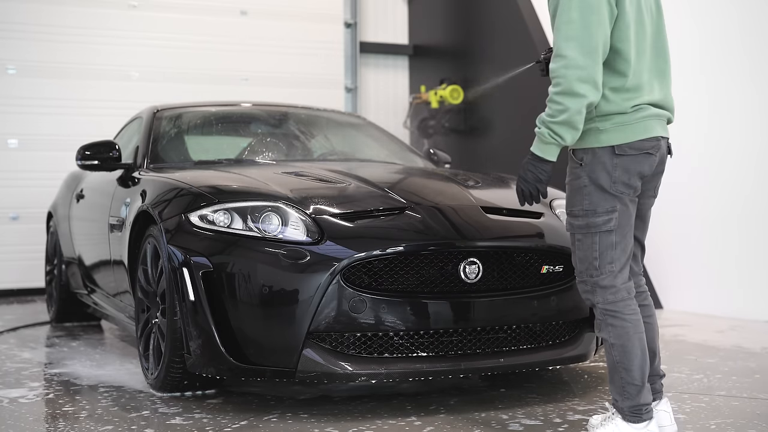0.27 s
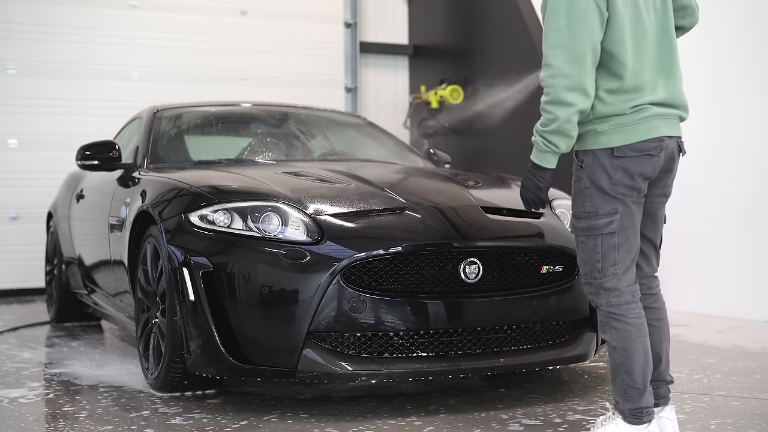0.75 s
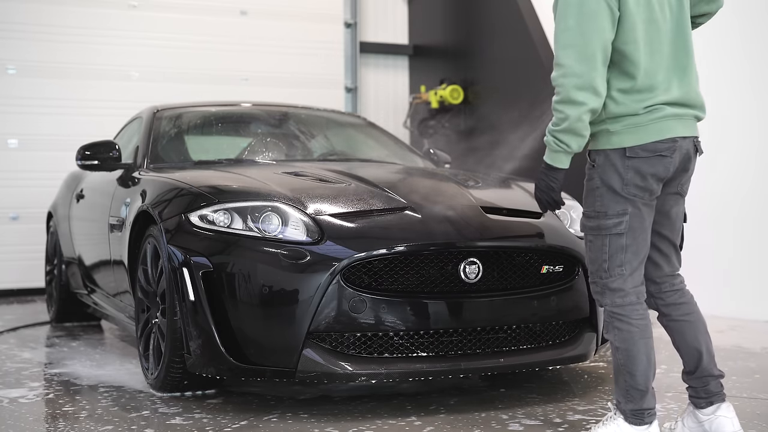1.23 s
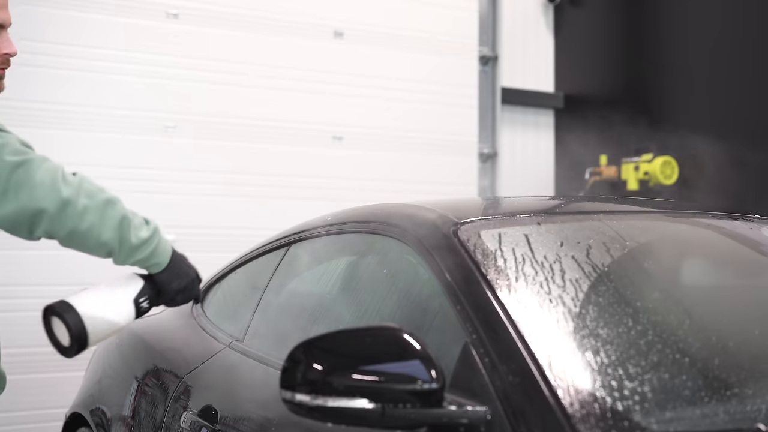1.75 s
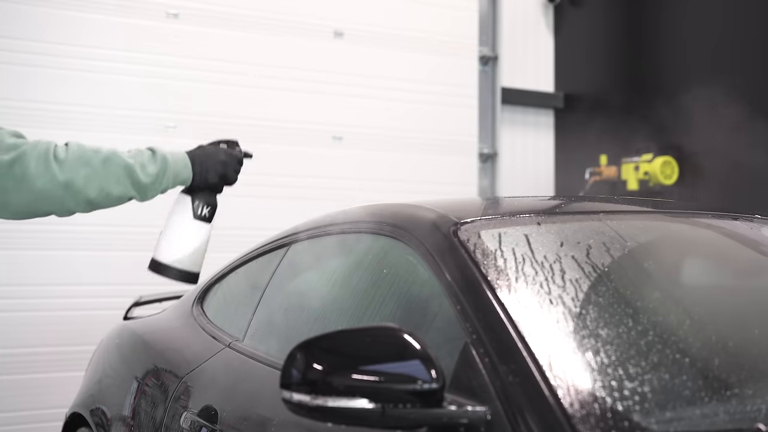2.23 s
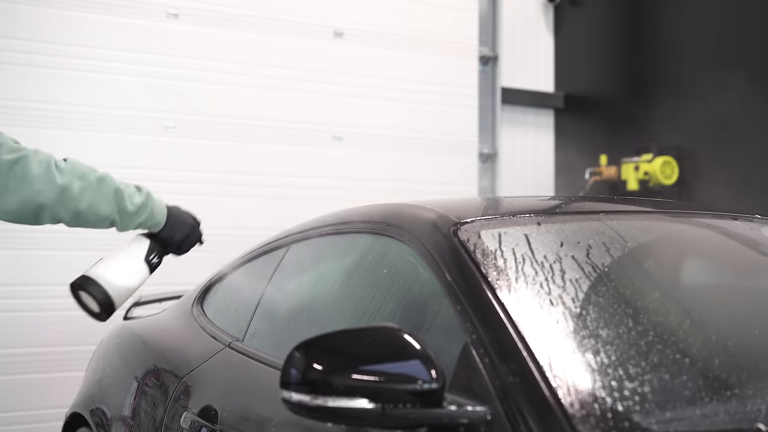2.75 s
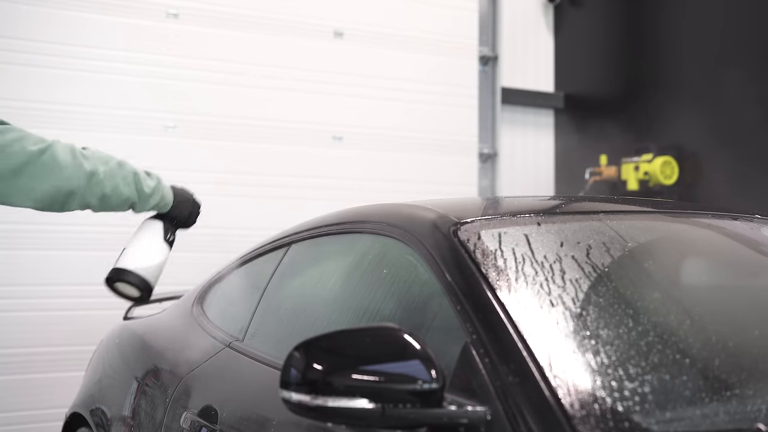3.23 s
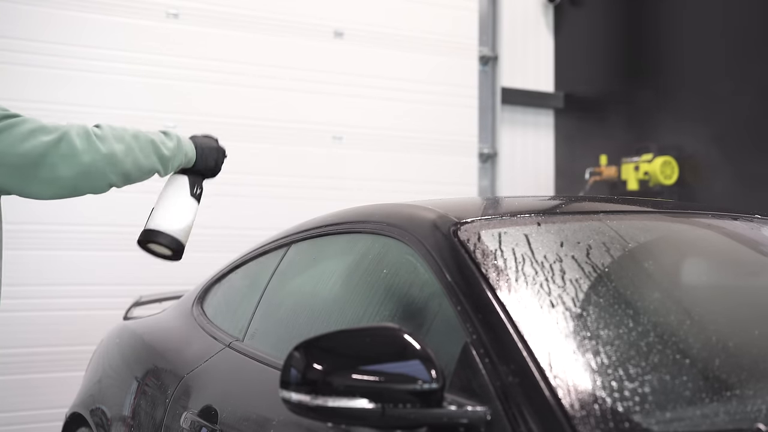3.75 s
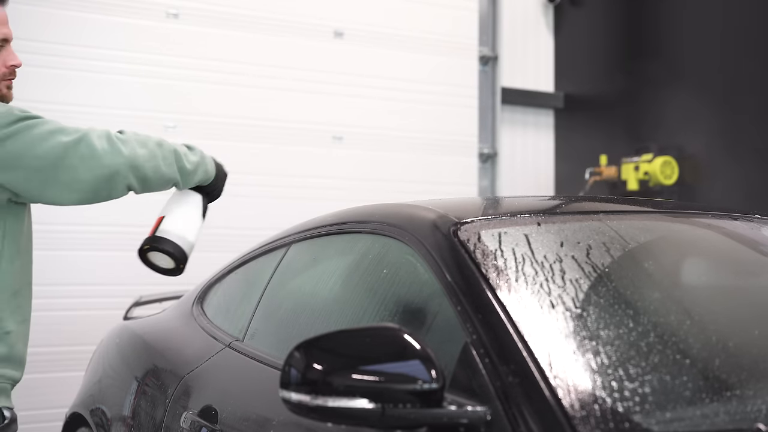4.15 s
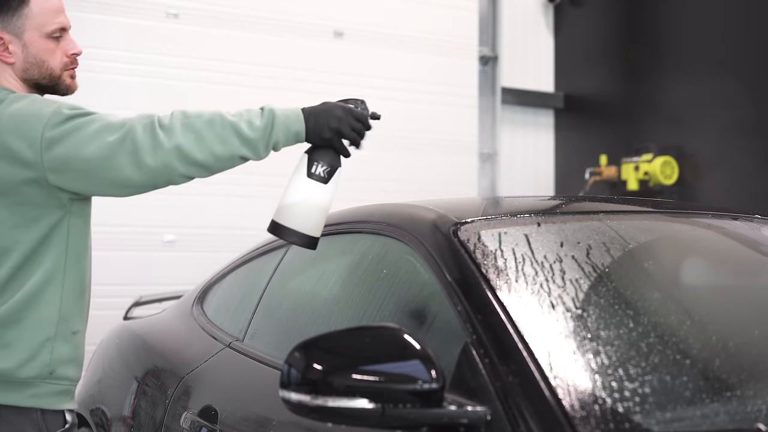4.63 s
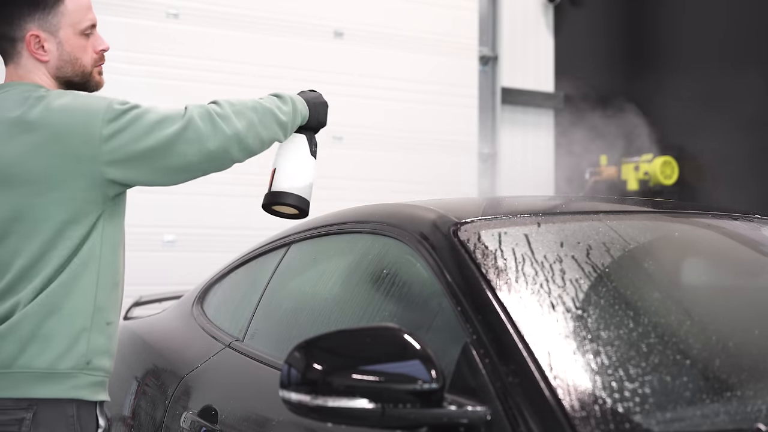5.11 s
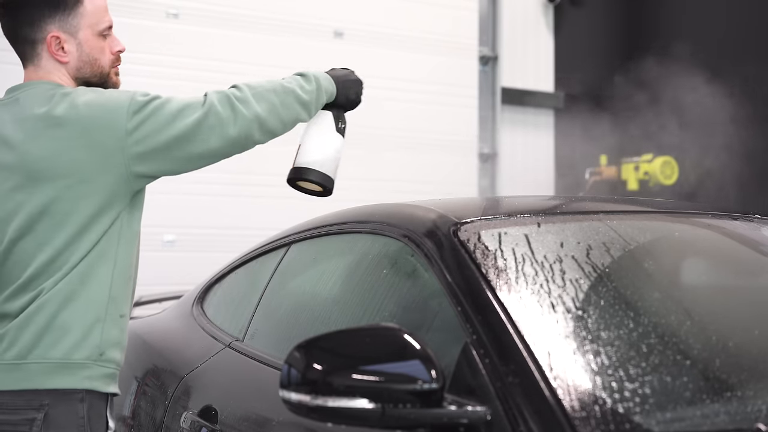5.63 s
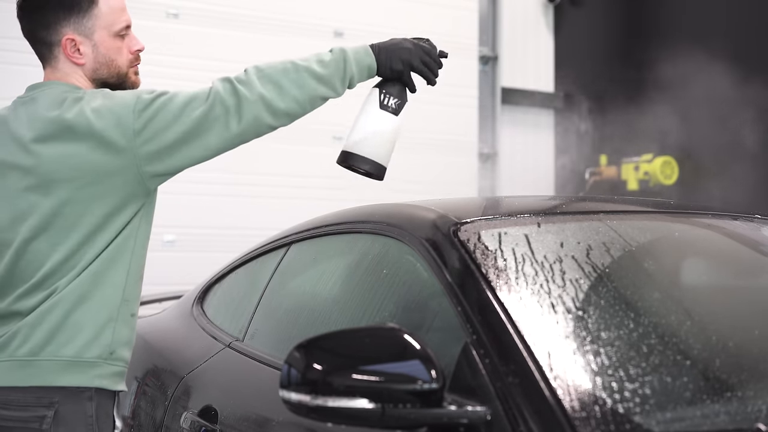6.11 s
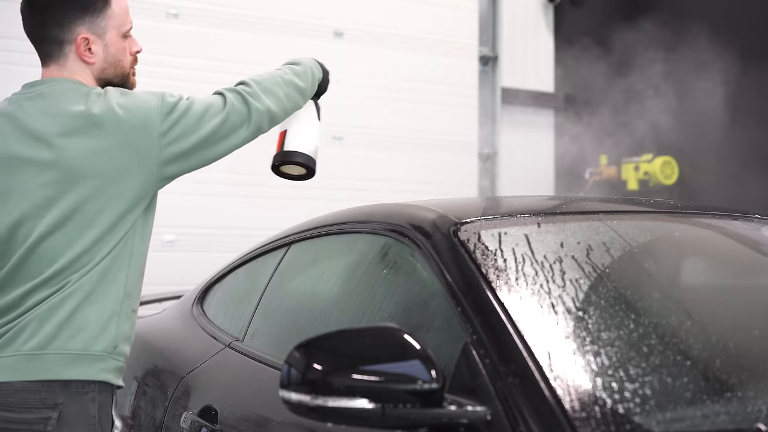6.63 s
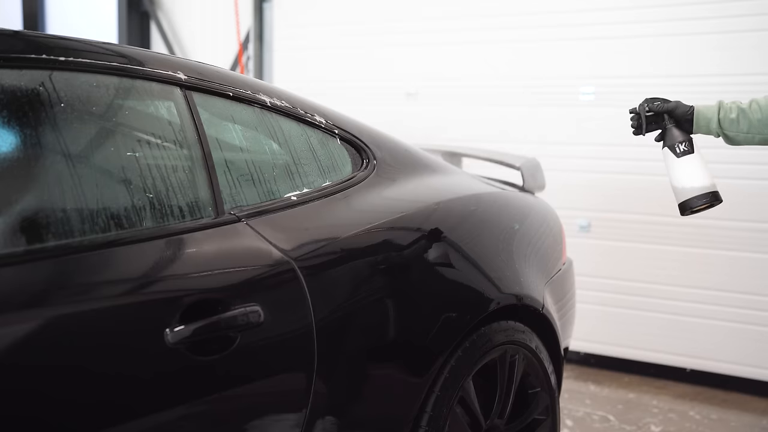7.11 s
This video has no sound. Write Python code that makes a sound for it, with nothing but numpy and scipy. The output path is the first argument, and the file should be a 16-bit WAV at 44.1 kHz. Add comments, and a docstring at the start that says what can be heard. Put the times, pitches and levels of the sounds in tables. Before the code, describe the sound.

Four short distant spray hisses in a hard-walled garage, then close trigger-sprayer strokes hiss back and forth with plastic clacks and a faint spring ring.

```python
"""Four quick sprayer bursts hiss from beyond a car's bonnet in a large, hard-walled garage.
Then, close by, a hand trigger pump sprays on both pull and return: noise under valve and pressure gains.
Echoes off the car comb the hiss. The plastic trigger clacks and ticks as struck modes, and its spring sings.
Rumble, still air and settling mist are coloured noise; a diffuse noise tail is the garage."""
import sys
import numpy as np
from scipy import signal
from scipy.fft import rfft, irfft
from scipy.io import wavfile
from scipy.ndimage import uniform_filter1d, map_coordinates

SR = 44100
rng = np.random.default_rng(int(sys.argv[2]) if len(sys.argv) > 2 else 0)


def inscribe(sig):
    """Save sig as 16-bit PCM at rate SR to the path in sys.argv[1].

    A 1-D sig is mono; a 2-D sig holds one channel per row.
    Samples are clipped to [-1, 1] before scaling.
    """
    pcm = np.round(np.clip(np.atleast_2d(sig).T, -1, 1) * 32767)
    wavfile.write(sys.argv[1], SR, pcm.astype(np.int16))


N = 324576
TIME = np.arange(N) / SR

# building rumble, levels: t/s, deep band/dB, mean of upper band/dB
RUMBLE_DB = [(0, -54, -63), (.45, -63, -60), (.95, -63, -61), (1.2, -63, -55), (1.6, -68, -61),
             (2.0, -75, -63), (2.45, -60.5, -61.5), (3.1, -68.5, -57.5), (4.6, -63, -65), (6.5, -65.5, -61),
             (7.36, -55.5, -63)]
# rumble spectra, relative: f/Hz, density/dB
DEEP_RUMBLE = [(20, -33), (35, -13), (50, -4), (65, 3), (85, 0.5), (120, -10.5), (250, -42)]
UPPER_RUMBLE = [(40, -36), (75, -7.5), (100, 2.5), (170, 0), (250, -10.5), (400, -13), (800, -42)]
# still air, relative spectrum: f/Hz, density/dB
AIR = [(120, -32.5), (200, -0.5), (946, -8), (1360, -12), (1510, -17.5), (2020, -22.5), (2210, -27),
       (2420, -33), (3800, -17), (4160, -8.5), (4550, -9), (6530, -19.5), (15000, -26.5)]
AIR_DB = -62.5
# mist settling on paint and floor: t/s, mean level/dB
PATTER_DB = [(0, -57), (1.4, -56.5), (2.4, -60.5), (4.8, -60), (5.9, -59.5), (7.36, -59.5)]
# its relative spectrum: f/Hz, density/dB
PATTER = [(150, -16.5), (300, -1), (600, -4.5), (1000, -1), (1500, 0), (2200, -3), (4000, 1), (6000, -18.5),
          (12000, -35)]

# garage tail, decay: f/Hz, t60/s
HALL_T60 = [(150, 1.45), (500, 0.96), (1000, 1.36), (2000, 1.33), (4000, 0.9), (8000, 0.7), (15000, 1.16)]
# garage tail, colour: f/Hz, gain/dB
HALL_COLOUR = [(150, 5), (350, 4), (600, 1.5), (920, -1.5), (1300, -0.5), (2200, -5.5), (4000, 4),
               (8000, 4.5), (15000, -6)]
FAR_SEND_DB, NEAR_SEND_DB = -14.5, -15.5
WALL_RISE_S = 0.013

# full pulls: t/s, hall send of trigger sounds/dB, spring ring before trim/dB
PULLS = [(1.933, -7.5, -73), (3.06, -4, -56), (4.097, -5, -46), (5.385, -5, -66), (6.717, -10.5, -75)]
# return spring modes: f/Hz, relative level/dB, t60/s
SPRING = [(920, 0.5, 1.4), (952, -4.5, 1.4), (880, -2.5, 1.3), (1166, -5, 0.61), (1467, -6, 1.07),
          (1794, -2, 1.2), (1850, -9, 0.89), (2068, 8, 0.13)]
SPRING_TRIM_DB = -1.5

# seal and glove rub: t/s, length/s, level before the swell/dB, f/Hz, width of each of two passes/Hz
RUBS = [(1.386, 0.18, -58.5, 845, 1000), (2.475, 0.11, -53, 1000, 500), (3.572, 0.11, -61, 966, 596),
        (4.625, .17, -60.5, 546, 450), (5.242, 0.062, -52.5, 572, 129), (5.256, 0.035, -49, 1300, 1800),
        (5.917, 0.1, -52.5, 1120, 503), (6.052, 0.15, -56, 657, 1010), (6.615, 0.051, -56, 640, 400)]
# trigger scrape ahead of each full pull's stop
SCRAPE_LEAD_S, SCRAPE_S, SCRAPE_DB = .028, 0.037, -49.5
SCRAPE_HZ, SCRAPE_WIDTH_HZ = 2160, 3000

# trigger and valve ticks: t/s, level before trim/dB, ring f/Hz, ring gain over the plain knock/dB
TICKS = [(1.884, -34, 860, 6), (2.472, -34, 900, 26), (2.514, -31, 1120, 18), (2.539, -32.5, 1180, 11),
         (2.548, -34.5, 837, 11), (3.021, -31, 920, 11), (3.573, -31, 950, 26), (4.066, -33.5, 940, 7),
         (4.691, -28.5, 2310, 10), (4.712, -35, 581, 18), (4.736, -37, 1110, 15), (5.338, -33.5, 1720, 16),
         (5.365, -36, 1670, 5), (6.039, -34.5, 1270, 13), (6.094, -35.5, 480, 32), (6.127, -38, 1020, 12),
         (6.676, -30.5, 1930, 9), (7.122, -36.5, 1510, 11)]
# trigger stop hits and rebounds: t/s, level before trim/dB, ring f/Hz, ring gain over the plain knock/dB
CLACKS = [(1.919, -27.5, 1890, 8), (1.924, -23, 850, -12), (1.933, -18.5, 2280, 0), (1.946, -22, 1460, 10),
          (1.955, -29, 3700, 1), (3.055, -17, 2320, -9), (3.067, -22.5, 1750, 11),
          (3.082, -25.5, 1750, -10), (3.091, -27.5, 910, 7), (4.093, -17, 2080, 13),
          (4.098, -18.5, 1950, 13), (4.121, -25, 1460, 3), (5.382, -18.5, 1680, 8), (5.385, -25.5, 326, 9),
          (5.402, -34, 920, 8), (5.411, -30.5, 2760, 1), (6.714, -21, 2340, 1), (6.733, -23.5, 885, -4),
          (6.743, -27.5, 2000, 0)]
TICK_TRIM_DB, CLACK_TRIM_DB = -13.0, -8.5
# plastic body, relative spectrum: f/Hz, gain/dB
CLACK_COLOUR = [(70, -50), (150, -23), (300, -6), (600, -8), (900, 0), (1450, -4), (2100, -2.5), (2700, -5),
                (3700, -6.5), (4300, -14), (5200, -24), (7000, -32.5), (11000, -37), (15000, -44)]
CHATTER_GAP_S, CHATTER_STEP_DB = .0045, -7.5

# jet fizz, relative spectra: f/Hz, density/dB
FAR_JET = [(300, -27), (1000, -17), (2500, -2), (5000, -4.5), (6500, 0), (9000, 0.5), (12000, -2.5),
           (15800, -5.5)]
NEAR_JET = [(300, -6), (650, -44), (900, 5), (1300, -14.5), (2000, -11.5), (3000, -6), (5000, -4.5),
            (6500, 2), (8000, 1.5), (11000, -0.5), (13500, 2), (15800, -2.5)]
# nozzle rush at pitch ratio 1, relative spectrum: f/Hz, density/dB
RUSH = [(1000, -36.5), (2200, -11), (2800, -8.5), (3300, -2), (3700, 1), (4100, -3.5), (4700, -11.5),
        (5600, -10.5), (8000, -29.5)]

# far squeezes: t/s, rise/s, time to release/s, jet/dB, nozzle rush/dB, bonnet echo gain
BURSTS = [(0.0, 0.087, .15, -46, -45.5, .26), (0.344, 0.13, 0.19, -48, -46.5, 0.23),
          (0.739, 0.15, .19, -52.5, -47, .1), (1.115, 0.17, 0.17, -52, -47, 0.11)]
JET_FALL_DB_PER_S, RUSH_FALL_DB_PER_S = 182, 68  # after release
BONNET_ECHO_MS = 1.47

# last drops as the piston turns: t/s, length/s, peak jet gain/dB
SPITS = [(2.484, 0.056, -68.5), (2.546, 0.005, -57), (3.598, 0.048, -63.5), (4.713, 0.052, -61),
         (6.061, 0.049, -63), (6.127, 0.0087, -57), (7.112, 0.079, -63.5)]
SPIT_RUSH_DB = 2.5  # over the jet

# close strokes, pull and return in turn:
# t/s, length/s, jet before arch and lean/dB, lean start to end/dB, nozzle rush before end boosts and lean/dB
STROKES = [(1.436, .465, -52, -3.5, -60.5), (2.02, 0.45, -52.7, -2, -59), (2.598, .43, -51, -6, -58),
           (3.127, 0.45, -51.2, 5, -58.5), (3.68, 0.38, -50, -0.5, -58), (4.194, .5, -49, -1, -57),
           (4.805, .525, -50.8, -7.5, -61.5), (5.496, .525, -50.5, 8, -59), (6.19, .5, -50.5, -9, -59),
           (6.746, 0.41, -53, -3.5, -61.5), (7.213, 0.45, -55.5, -4, -62.5)]
VALVE_OPEN_S, VALVE_CLOSE_S = 0.081, .1
ARCH_DB = 3  # pressure peaks in mid-stroke
EARLY_RUSH_DB, EARLY_RUSH_S = 9, 0.1  # low pressure: more rush than fizz
LATE_RUSH_DB, LATE_RUSH_S = 8, 0.1
RUSH_PITCH, RUSH_SAG = 1.03, .11  # mid-stroke ratio, drop in that ratio at both ends
# echo off the nearest panel, per stroke, before arm shake: delay at start/ms, delay at end/ms, signed gain
SWINGS = [(1.1, .63, .32), (.62, 1.05, .36), (.9, .53, .38), (.5, .73, .41), (.72, .52, .4), (.6, .45, .34),
          (.42, .43, -.3), (.42, .46, -.32), (.7, .49, .33), (.53, .53, .08), (.54, .54, .08)]
ARM_SHAKE = .025  # rms share of delay
SECOND_PATH, SECOND_SHARE = 1.88, 1.45  # delay over first echo's, gain over first echo's squared
CAR_PATH, CAR_STRENGTH = 6.2, 0.23  # echo off the car's side: delay over first echo's, gain

EDGE_HZ = 15850


def amp(db):
    """Decibels to gain."""
    return 10 ** (np.asarray(db) / 20)


def unit(x):
    """Scales to rms 1."""
    return x / np.sqrt(np.mean(x ** 2) + 1e-20)


def at_hz(points, hz):
    """Reads a spectrum on a log-frequency axis."""
    f, value = np.transpose(points)
    return np.interp(np.log(hz + 1), np.log(f + 1), value)


def at_time(rows, t):
    """Reads every column of a curve at times t."""
    s, *columns = np.transpose(rows)
    return [np.interp(t, s, c) for c in columns]


def ease(u):
    """Soft step from 0 to 1."""
    return np.sin(np.pi / 2 * np.clip(u, 0, 1)) ** 2


def add(mix, s, sound):
    """Mixes a sound in at s seconds."""
    part = mix[max(round(s * SR), 0):][:len(sound)]
    part += sound[:len(part)]


def tint(x, points):
    """Minimum-phase colour filter: causal, so attacks stay sharp."""
    size = 4096
    gain_db = np.maximum(at_hz(points, abs(np.fft.fftfreq(size, 1 / SR))), -100)
    log_spectrum = np.conj(signal.hilbert(np.log(amp(gain_db))))
    taps = np.fft.ifft(np.exp(log_spectrum)).real[:size // 2]
    return signal.oaconvolve(x, taps)[:len(x)]


def noise(points, size=N):
    """Steady noise of a given spectrum, rms 1."""
    return unit(tint(rng.standard_normal(size), points))


def wobble(rate_hz, size=N):
    """Smooth random curve, rms 1, rolling off above the given rate."""
    hz = np.fft.rfftfreq(size, 1 / SR)
    spectrum = rfft(rng.standard_normal(size)) / (1 + (hz / rate_hz) ** 2)
    return unit(irfft(spectrum, size))


def resonate(x, hz, width):
    """One-pole complex resonance, peak gain about 1, width in Hz."""
    r = np.exp(-np.pi * abs(width) / SR)
    return 2 * signal.lfilter([1 - r], [1, -r * np.exp(2j * np.pi * hz / SR)], x).real


def delayed(x, ms):
    """Echo whose delay may glide."""
    place = np.arange(len(x)) - ms * SR / 1000
    return map_coordinates(x, [place], order=3)


def background():
    """Coloured noise: building rumble, still air and settling mist."""
    deep_db, upper_db = at_time(RUMBLE_DB, TIME)
    deep = amp(deep_db) * noise(DEEP_RUMBLE)
    upper = amp(upper_db + 1.65 * wobble(rate_hz=6.1)) * noise(UPPER_RUMBLE)
    patter_db = at_time(PATTER_DB, TIME)[0] + 1.3 * wobble(rate_hz=44)
    patter = amp(patter_db) * noise(PATTER)
    return deep + upper + amp(AIR_DB) * noise(AIR) + patter


def hall(x):
    """Diffuse noise tail, each band dying at its own speed."""
    hz, t, bands = signal.stft(rng.standard_normal(SR), SR, nperseg=256)
    decay = amp(-60 * t / at_hz(HALL_T60, hz)[:, None])
    tail = signal.istft(bands * decay, SR, nperseg=256)[1][:SR]
    t = TIME[:SR]
    tail *= np.clip(t / WALL_RISE_S, 0, 1) * (1 + np.exp(-t / WALL_RISE_S))  # nearest walls answer first
    return signal.fftconvolve(x, tint(tail / np.linalg.norm(tail), HALL_COLOUR))[:N]


def spring():
    """Return spring rings on after each full pull: decaying narrow-band noise, so its notes sound blurred and
    wavering."""
    out, t = np.zeros(N), TIME[:SR]
    for s, _, ring_db in PULLS:
        for hz, db, t60 in SPRING:
            source = rng.standard_normal(2 * SR)
            note = resonate(resonate(source, hz, width=44), hz, width=44)[SR:]  # settled part
            add(out, s, amp(ring_db + db + SPRING_TRIM_DB - 60 * t / t60) * unit(note))
    return out


def rub(length, hz, width):
    """Soft swell of friction noise in one broad resonance."""
    grip = rng.standard_normal(SR)[:int(length * SR)]
    friction = resonate(resonate(grip, hz, width), hz, width)
    return unit(friction) * np.hanning(len(grip))


def rubs():
    """Seal and glove friction as strokes turn; trigger friction ahead of its stop."""
    out = np.zeros(N)
    for s, length, db, hz, width in RUBS:
        add(out, s, amp(db) * rub(length, hz, width))
    for s, *_ in PULLS:
        add(out, s - SCRAPE_LEAD_S, amp(SCRAPE_DB) * rub(SCRAPE_S, SCRAPE_HZ, SCRAPE_WIDTH_HZ))
    return out


def knock(ring_hz, ring_width, ring_db, rattle_s):
    """Brief rattle of loose parts excites the plastic body and one mode; peak short-term rms 1."""
    t = np.arange(2600) / SR
    spectrum = rfft(rng.standard_normal(len(t)) * np.exp(-t / rattle_s))
    even = irfft(spectrum / abs(spectrum), len(t))  # hard contact: flat spectrum
    give = 1 - np.exp(-t / 0.0014)  # plastic yields for a moment
    body = tint(even * give * np.exp(-t / (3 * rattle_s)), CLACK_COLOUR)
    body = body + amp(-6.0) * resonate(body, hz=316, width=140)  # hollow bottle thump
    body = body + amp(ring_db) * resonate(body, ring_hz, ring_width)
    return body / np.sqrt(uniform_filter1d(body ** 2, size=130).max())


def ticks():
    """Light contacts: a narrower mode rings longer on one hollow note."""
    out = np.zeros(N)
    for s, db, hz, ring_db in TICKS:
        add(out, s, amp(db) * knock(hz, ring_width=79, ring_db=ring_db, rattle_s=0.0051))
    return amp(TICK_TRIM_DB) * out


def clacks(count=3):
    """Trigger slams into its stop; each blow bounces twice, weaker every time."""
    out = np.zeros(N)
    for s, db, hz, ring_db in CLACKS:
        for k in range(count):
            blow = knock(hz, ring_width=200, ring_db=ring_db, rattle_s=0.0038)
            add(out, s + k * CHATTER_GAP_S, amp(db + k * CHATTER_STEP_DB) * blow)
    return amp(CLACK_TRIM_DB) * out


def mist(jet, rush, colour, sputter_db, pitch=1):
    """Liquid tears into mist: wide sputtering fizz plus narrower nozzle rush, each under its gain."""
    fizz = amp(sputter_db * wobble(rate_hz=170, size=SR)) * jet * noise(colour, size=SR)
    place = np.cumsum(pitch * np.ones(SR))  # read speed sets the pitch
    nozzle = map_coordinates(noise(RUSH, size=SR), [place], order=3)
    return fizz + amp(sputter_db * wobble(rate_hz=55, size=SR)) * rush * nozzle


def far_spray():
    """Bursts across the bonnet swell, hold and die away, with one fixed-delay reflection from it."""
    out, t = np.zeros(N), TIME[:SR]
    for s, rise_s, length, jet_db, rush_db, bounce in BURSTS:
        squeeze, released = ease(t / rise_s), np.maximum(t - length, 0)
        jet = squeeze ** 0.56 * amp(jet_db - JET_FALL_DB_PER_S * released)
        rush = squeeze ** 0.41 * amp(rush_db - RUSH_FALL_DB_PER_S * released)
        hiss = mist(jet, rush, FAR_JET, sputter_db=.1)
        add(out, s, hiss + bounce * delayed(hiss, BONNET_ECHO_MS))
    return out


def spits():
    """Last drops sputter out between strokes: short arched puffs of uneven mist."""
    out, t = np.zeros(N), TIME[:SR]
    for s, length, db in SPITS:
        gain = amp(db) * np.sin(np.pi * np.minimum(t / length, 1)) ** .5
        add(out, s, mist(gain, amp(SPIT_RUSH_DB) * gain, NEAR_JET, sputter_db=5.0))
    return out


def combed(hiss, u, start_ms, end_ms, strength):
    """Three echoes glide over u = 0 to 1; the arm wavers, and slows where nearest the panel."""
    away = u if end_ms > start_ms else 1 - u
    path_ms = min(start_ms, end_ms) + abs(end_ms - start_ms) * away ** 2
    ms = path_ms * (1 + ARM_SHAKE * wobble(rate_hz=2, size=SR))
    first = strength * delayed(hiss, ms)
    second = SECOND_SHARE * strength ** 2 * delayed(hiss, SECOND_PATH * ms)  # reflected twice
    car_side = CAR_STRENGTH * delayed(hiss, CAR_PATH * ms)
    return hiss + first + second + car_side


def near_spray():
    """Stroke opens the valve, arches in pressure, closes it; rush is boosted and lower at both ends."""
    out, t = np.zeros(N), TIME[:SR]
    for (s, length, jet_db, lean_db, rush_db), swing in zip(STROKES, SWINGS):
        u, left = np.minimum(t / length, 1), np.maximum(length - t, 0)
        valve = ease(t / VALVE_OPEN_S) * ease(left / VALVE_CLOSE_S)
        slack = (2 * u - 1) ** 2  # 0 in mid-stroke, 1 at both ends
        early_db = EARLY_RUSH_DB * np.exp(-(t / EARLY_RUSH_S) ** 2)
        late_db = LATE_RUSH_DB * np.exp(-(left / LATE_RUSH_S) ** 2)
        jet = valve * amp(jet_db - ARCH_DB * slack)
        rush = valve ** 0.86 * amp(rush_db + early_db + late_db)
        hiss = mist(jet, rush, NEAR_JET, sputter_db=0.26, pitch=RUSH_PITCH - RUSH_SAG * slack)
        add(out, s, combed(amp(lean_db * (u - .5)) * hiss, u, *swing))
    return out


def scene():
    """Sprayer and garage, one microphone on both channels."""
    far, near = far_spray(), near_spray() + spits()
    trigger = clacks() + ticks() + rubs()
    trigger_send = amp(at_time(PULLS, TIME)[0])
    room = hall(trigger_send * trigger + amp(FAR_SEND_DB) * far + amp(NEAR_SEND_DB) * near)
    mono = far + near + trigger + spring() + room + background()
    return np.array([mono, mono])


def record(dry):
    """Recorder's band limit: linear-phase low-pass."""
    taps = signal.firwin(511, EDGE_HZ, window=("kaiser", 8), fs=SR)
    return signal.oaconvolve(dry, taps[None], "same")


dry = scene()
out = record(dry)
inscribe(out)
```